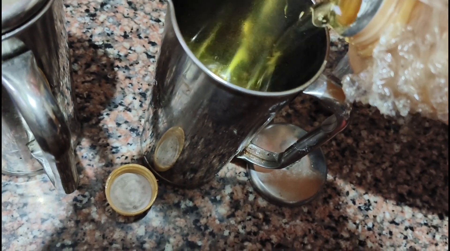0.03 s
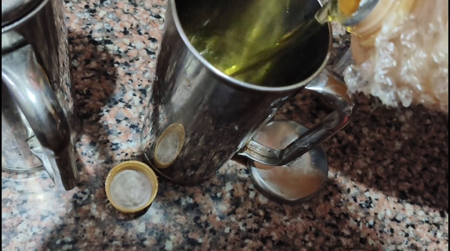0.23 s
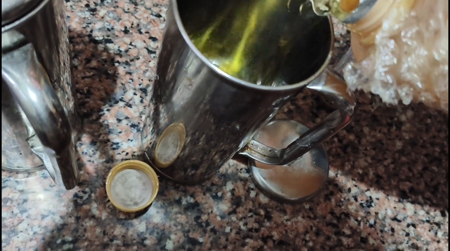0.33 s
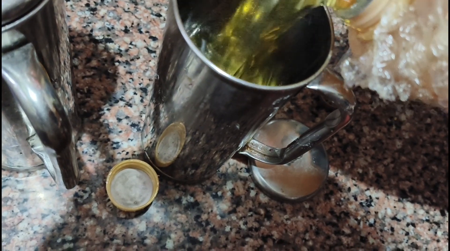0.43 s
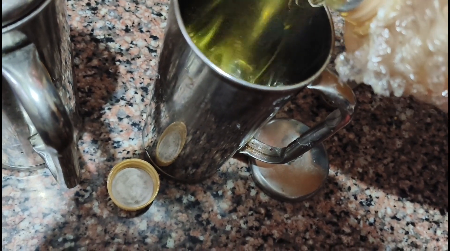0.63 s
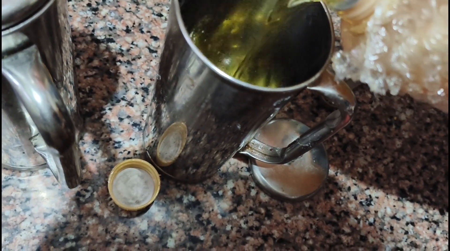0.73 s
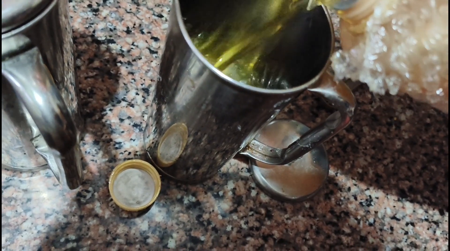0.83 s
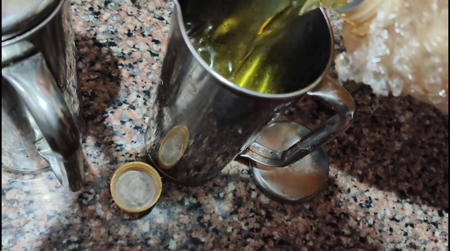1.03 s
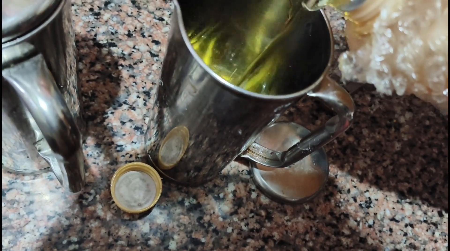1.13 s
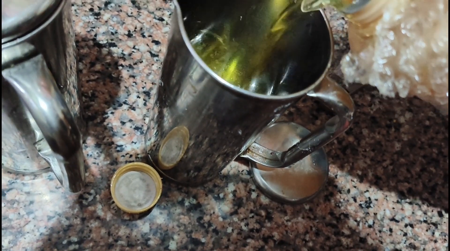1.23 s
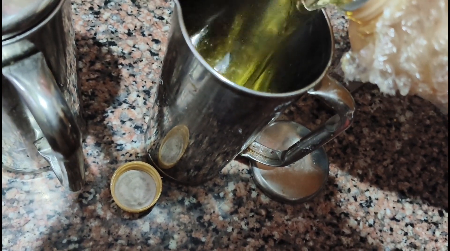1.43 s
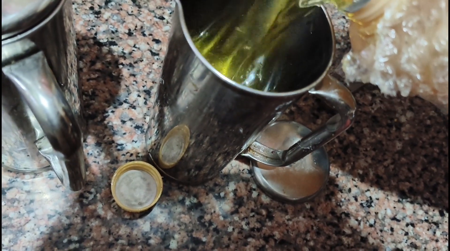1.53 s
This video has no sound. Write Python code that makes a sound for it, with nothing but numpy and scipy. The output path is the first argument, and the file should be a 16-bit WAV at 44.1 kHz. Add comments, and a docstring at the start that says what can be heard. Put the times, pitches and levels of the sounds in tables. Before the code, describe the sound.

Irregular hollow plops sound close by, left of the microphone, as liquid drips into a metal jug on a kitchen counter. One loud plop comes early, then lighter drips, two quick gurgles and a soft swelling rush.

```python
"""Hollow plops come first: oil dribbles from a bottle into a steel jug, close by and to the left.
Each drop makes the air in the jug ring, with wet splats and tiny ringing bubbles.
Shrinking pockets of air gurgle upward, once early on and twice in quick succession later.
The stone counter and kitchen walls throw back short echoes over a faint hum.
A soft rush swells at the end."""
import sys
import numpy as np
from scipy import signal
from scipy.fft import rfft, irfft
from scipy.io import wavfile
from scipy.ndimage import uniform_filter1d

SR = 44100
rng = np.random.default_rng(int(sys.argv[2]) if len(sys.argv) > 2 else 0)


def pcm_store(signal):
    """Save signal as 16-bit PCM."""
    levels = np.round(np.clip(np.atleast_2d(signal), -1, 1) * 32767)
    wavfile.write(sys.argv[1], SR, levels.astype(np.int16).T)


N = 70560  # 1.6 s

# Table levels are relative. t60 is the time a sound takes to fade by 60 dB.
# drops that set the jug's air ringing: t/s, level/dB, f/Hz, t60/s
PLOPS = [(0.0626, -21.5, 461, 0.052), (.219, 6, 469.2, 0.041), (0.3937, -20.5, 468, 0.076),
         (.4102, -27.5, 476.7, 0.083), (.455, -38, 472, 0.11), (0.5151, -29.5, 475, 0.06),
         (0.5868, -19.5, 462.4, 0.072), (0.656, -30.5, 465, 0.047), (0.6924, -27, 466.8, 0.1),
         (0.7803, -26, 473, 0.086), (0.8255, -30.5, 455, 0.07), (0.8888, -17, 464, 0.091),
         (0.9016, -22, 487, 0.099), (1.1491, -25.5, 420, 0.057), (1.326, -7.5, 431.5, 0.039)]
# wet splats: t/s, low level/dB, middle level/dB, top level/dB
SPLATS = [(0.072, -59.5, -31.5, -53), (0.2179, -20.5, -43, -42.5), (0.259, -38, -39, -40),
          (0.28, -44, -46.5, -49.5), (0.3918, -48.5, -36.5, -45.5), (0.412, -58.5, -25, -58),
          (0.5878, -43.5, -35.5, -38.5), (.656, -53, -30, -58), (0.694, -41.5, -31, -93),
          (0.78, -34.5, -32.5, -42), (.889, -30, -26.5, -17), (1.152, -70, -40, -62.5),
          (1.3117, -31, -26, -54.5), (1.3279, -22.5, -30, -42), (1.382, -35, -35, -54)]
# centres of those three bands: f/Hz
SPLAT_BANDS = [1537, 6800, 11800]
# tone the jug gives a splat: f/Hz, level/dB
JUG_COLOUR = [(100, -27.5), (400, 8), (800, -4.5), (1400, 5), (2200, -1.5), (2850, 5), (3250, -10.5),
              (3650, -12), (4400, -1), (6500, -3.5), (8200, -2.5), (9800, -8), (12000, -11.5), (15500, -9)]
# small ringing bubbles: t/s, level/dB, f/Hz, t60/s
BUBBLES = [(0.0636, -59, 7020, .01), (0.2208, -41.5, 3770, .0059), (0.3835, -46, 5790, 0.0058),
           (.449, -58, 6920, 0.0036), (.514, -65, 4430, 0.081), (0.5439, -54, 9090, 0.0097),
           (.545, -47.5, 7280, 0.019), (0.5744, -47.5, 5620, 0.0068), (0.578, -51, 4500, 0.0075),
           (0.588, -48.5, 1352, 0.043), (0.6578, -38, 6300, 0.0059), (0.656, -46, 1440, 0.018),
           (0.6891, -43, 4490, 0.015), (0.7634, -47, 7860, .009), (0.83, -48.5, 2147, 0.18),
           (0.8429, -37, 6780, 0.01), (0.865, -40.5, 1455, 0.068), (0.865, -48.5, 2530, 0.05),
           (0.8889, -28, 6290, 0.005), (0.891, -29, 5106, 0.0017), (1.0608, -43.5, 2050, 0.021),
           (1.0606, -49, 4610, 0.0052), (1.148, -45.5, 344, 0.16), (1.215, -48, 1053, 0.086),
           (1.3116, -29.5, 2290, 0.0022), (1.312, -35, 4330, 0.0031), (1.3268, -33, 2124, 0.011),
           (1.3277, -28, 6440, 0.00083)]
# blurred notes of the steel jug: f/Hz, level/dB, width/Hz
STEEL_NOTES = [(1490, -6.5, 110), (2879, 8, 98), (4220, -0.5, 440), (4880, -7, 310), (5980, -14, 590),
               (8005, -0.5, 300)]
# closing air pockets: t/s, length/s, level/dB, first f/Hz, last f/Hz
GURGLES = [(.268, .044, -35, 800, 2350), (1.212, .056, -40, 540, 920), (1.272, .036, -54, 1250, 2700)]
# loudness of the liquid's low burble: t/s, level/dB
BURBLE_LEVELS = [(1.11, -79), (1.147, -57.5), (1.157, -52.5), (1.201, -48.5), (1.237, -53.5),
                 (1.269, -61.5), (1.321, -62)]
# tone of the burble: f/Hz, level/dB
BURBLE_COLOUR = [(90, -14.5), (200, 9.5), (280, -6), (360, 2), (500, 9), (640, -36.5), (1200, -76.5)]
# loudness of the closing rush: t/s, body level/dB, treble level/dB
RUSH_LEVELS = [(1.342, -76.5, -54), (1.39, -60, -55.5), (1.425, -47.5, -67), (1.477, -55, -62),
               (1.495, -44.5, -47), (1.531, -42, -43), (1.549, -31.5, -38), (1.6, -37, -37.5)]
# tone of its body and its treble: f/Hz, level/dB
RUSH_BODY = [(100, -36), (260, -37), (350, -2), (700, -0.5), (1150, 0), (1600, -8.5), (3000, -41)]
RUSH_TREBLE = [(700, -31.5), (1500, 1), (3000, 1.5), (5000, 1), (7000, -7.5), (10000, -15), (15000, -27),
               (16500, -37)]
# first echoes at each ear: delay/s, level/dB
ECHOES_LEFT = [(.0193, -5.8), (.0351, -14.3), (.0574, -27.9), (.0682, -22.3), (.1192, -33.3), (.1364, -37)]
ECHOES_RIGHT = [(.0094, -16.6), (.0193, -11.5), (.0351, -15.7), (.0505, -15), (.0743, -23), (.1118, -35.3),
                (.1319, -33.6)]
# how long the kitchen rings: f/Hz, t60/s
KITCHEN_DECAY = [(100, 0.17), (460, 0.43), (1500, 0.23), (5000, 0.14), (9000, 0.21), (16000, 0.13)]
# tone of the room's air and of the hum: f/Hz, level/dB
AIR_COLOUR = [(20, -20), (70, -6), (120, -6), (250, -9), (500, 0), (1000, -22), (2200, -12), (3400, -23.5),
              (6000, -19), (10000, -33), (16000, -45.5)]
HUM_COLOUR = [(20, -20.5), (50, -17), (73, 19.5), (95, 8.5), (150, -12.5), (300, -55.5)]
# loudness of the hum: t/s, level/dB
HUM_LEVELS = [(0, -83.5), (.16, -63), (.42, -63.5), (.53, -76), (.68, -58.5), (.9, -82.5), (1.101, -77),
              (1.241, -54.5), (1.38, -80), (1.6, -75)]

PLOP_RISE_S, THUMP_S, THUMP_DB = 0.0037, 0.00058, -31.5
CAVITY_HZ, CAVITY_WIDTH_HZ = 479, 175  # the jug's air rounds off every plop
SPLAT_RISE_S, SPLAT_T60_S = 0.0005, 0.011
BUBBLE_RISE_PER_S, BUBBLE_GLIDE_S, BUBBLE_WOBBLE = 5, 0.006, 0.025
BUBBLE_ATTACK_CYCLES, BUBBLE_ATTACK_MAX_S = 3.4, 0.0024
BUBBLE_ROUGH, BUBBLE_ROUGH_CYCLES = 0.4, 7
TICK_SAMPLES, TICK_ENERGY_S = 4096, 0.005  # a tick is one splat or one bubble
JUG_T60_S, STEEL_T60_S, STEEL_DB = 0.033, 0.14, -12.5
GURGLE_BEND, GURGLE_WOBBLE, GURGLE_ROUGH = 1.4, 0.025, 0.1
GURGLE_GAIN_DB, GURGLE_FADE_DB = 2, -13
AIR_DB, TREBLE_LIMIT_HZ = -66, 16300


def plops():
    """Each drop pushes the air in the jug: a low thump, and one low note that rings on."""
    notes, thumps = np.zeros((2, N))
    t = np.arange(SR // 4) / SR
    for start, db, hz, t60 in PLOPS:
        envelope = (1 - np.exp(-t / PLOP_RISE_S)) * amp(db - 60 * t / t60)
        add(notes, start, envelope * np.sin(2 * np.pi * hz * t))
        add(thumps, start, amp(db + THUMP_DB) * (t / THUMP_S) ** 2 * np.exp(-t / THUMP_S))
    notes = signal.lfilter(*signal.iirpeak(CAVITY_HZ, CAVITY_HZ / CAVITY_WIDTH_HZ, SR), notes)
    return pan(notes + thumps, right_db=-13.5) + room(notes, echo_db=0, tail_db=-21)


def splats():
    """Each wet splat is a short burst of noise, coloured by the jug."""
    out = np.zeros((2, N))
    t = np.arange(TICK_SAMPLES) / SR
    hz = abs(np.fft.fftfreq(TICK_SAMPLES, 1 / SR))
    envelope = (1 - np.exp(-t / SPLAT_RISE_S)) ** 2 * amp(-60 * t / SPLAT_T60_S)
    for start, *bands_db in SPLATS:
        gain = amp(value_at(list(zip(SPLAT_BANDS, bands_db)), hz) + value_at(JUG_COLOUR, hz))
        # a filter with these gains that keeps the start sharp (minimum phase)
        colour = np.fft.ifft(np.exp(np.conj(signal.hilbert(np.log(gain))))).real
        burst = in_jug(rng.standard_normal(TICK_SAMPLES) * envelope, direct=0.42)
        add(out, start, signal.fftconvolve(burst, colour[None], axes=1))
    return out


def bubbles():
    """Each tiny bubble swells into an unsteady note that rises a little and dies away."""
    out = np.zeros((2, N))
    t = np.arange(TICK_SAMPLES) / SR
    glide = 1 + BUBBLE_RISE_PER_S * np.minimum(t, BUBBLE_GLIDE_S)
    for start, db, hz, t60 in BUBBLES:
        cycles = np.cumsum(hz * (glide + BUBBLE_WOBBLE * wobble(TICK_SAMPLES))) / SR
        attack_s = min(BUBBLE_ATTACK_CYCLES / hz, BUBBLE_ATTACK_MAX_S)
        envelope = (1 - np.exp(-(t / attack_s) ** 2)) ** 2 * amp(-60 * t / t60)
        # the bursting film roughens the note, anew every few cycles
        roughness = 1 + BUBBLE_ROUGH * wobble(TICK_SAMPLES, BUBBLE_ROUGH_CYCLES * SR / hz)
        note = envelope * roughness * np.sin(2 * np.pi * cycles)
        add(out, start, amp(db) * in_jug(note, direct=1.3))
    return out


def ticks():
    """Splats and bubbles set the steel ringing and spread into the room."""
    wet = splats() + bubbles()
    ringing = wet + steel_ring(wet)
    reflected = room(ringing[0], echo_db=-27.5, tail_db=-12.5)
    return pan(ringing, right_db=-11.5) + pan(reflected, right_db=0.5)


def in_jug(x, direct):
    """A tick bounces between the steel walls; direct weighs the part that comes straight out."""
    t = np.arange(len(x)) / SR
    walls = unit_energy(rng.standard_normal((2, len(x))) * amp(-60 * t / JUG_T60_S))
    walls[:, 0] += direct
    scattered = signal.fftconvolve(x[None], walls, axes=1)[:, :len(x)]
    # as much energy as a sound of level 1 that lasts TICK_ENERGY_S
    return unit_energy(scattered) * np.sqrt(TICK_ENERGY_S * SR)


def steel_ring(x):
    """The jug holds a short, blurred, hollow ring after every tick."""
    t = np.arange(SR // 4) / SR
    hiss = rng.standard_normal((2, len(t)))
    ring = 0
    for hz, db, width in STEEL_NOTES:
        peak = signal.iirpeak(hz, hz / width, SR)
        ring += amp(db) * signal.lfilter(*peak, signal.lfilter(*peak, hiss))
    ring = unit_energy(ring * amp(-60 * t / STEEL_T60_S))
    return amp(STEEL_DB) * signal.fftconvolve(x, ring, axes=1)[:, :N]


def gurgles():
    """Over a low burble, shrinking pockets of air rise in pitch, faster and faster."""
    out = noise(BURBLE_COLOUR)[0] * loudness(*np.transpose(BURBLE_LEVELS), left=-120, right=-120)
    for start, length, db, first_hz, last_hz in GURGLES:
        progress = np.arange(0, length, 1 / SR) / length
        hz = first_hz * (last_hz / first_hz) ** (progress ** GURGLE_BEND)
        cycles = np.cumsum(hz * (1 + GURGLE_WOBBLE * wobble(len(hz)))) / SR
        flutter = 1 + GURGLE_ROUGH * wobble(len(hz))
        swell = amp(db + GURGLE_GAIN_DB) * np.minimum(progress / 0.37, 1)
        fade = np.sqrt(1 - progress) * amp(GURGLE_FADE_DB * progress)  # quieter as it shrinks
        add(out, start, flutter * swell * fade * np.sin(2 * np.pi * cycles))
    return pan(out, right_db=-6) + room(out, echo_db=-15.5, tail_db=-9.5)


def rush():
    """A soft, wide rush with a hollow body and a hissing top."""
    times, body_db, treble_db = np.transpose(RUSH_LEVELS)
    body = loudness(times, body_db, left=-120) * noise(RUSH_BODY, likeness=0.065)
    treble = loudness(times, treble_db, left=-120) * noise(RUSH_TREBLE, likeness=0.063)
    return body + treble


def room(x, echo_db, tail_db):
    """Single echoes off the counter and near walls, and a tail where each band fades at its own speed."""
    echoes = np.zeros((2, N))
    for ear, reflections in zip(echoes, (ECHOES_LEFT, ECHOES_RIGHT)):
        for delay, db in reflections:
            add(ear, delay, amp(db) * x)
    hz, t, bands = signal.stft(rng.standard_normal((2, SR // 2)), SR, nperseg=256)
    envelope = amp(-60 * t / value_at(KITCHEN_DECAY, hz)[:, None]) * np.minimum(t / 0.0022, 1)
    response = signal.istft(bands * envelope, SR, nperseg=256)[1]
    tail = signal.fftconvolve(x[None], response / np.linalg.norm(response[0]), axes=1)[:, :N]
    return amp(echo_db) * echoes + amp(tail_db) * tail


def background():
    """Quiet room air and a low hum that swells and sinks."""
    air = amp(AIR_DB) * noise(AIR_COLOUR, likeness=0.1)
    hum = loudness(*np.transpose(HUM_LEVELS)) * noise(HUM_COLOUR, likeness=0.84)
    return pan(air, right_db=-4.5) + hum


def noise(colour, likeness=0):
    """Stereo noise of level 1 with the given tone; likeness 1 makes both ears the same."""
    left, other = rng.standard_normal((2, N))
    right = likeness * left + np.sqrt(1 - likeness ** 2) * other
    gain = amp(value_at(colour, np.fft.rfftfreq(N, 1 / SR)))
    return unit_level(irfft(rfft([left, right]) * gain, N))


def wobble(size, span=150):
    """A random waver of level 1 that turns about every span samples."""
    return unit_level(uniform_filter1d(rng.standard_normal(size), size=max(round(span), 1)))


def amp(db):
    """Turns decibels into a gain."""
    return 10 ** (np.asarray(db) / 20)


def pan(x, right_db):
    """Leaves the left ear as it is and changes the right by right_db."""
    return x * amp([[0], [right_db]])


def loudness(times, db, left=None, right=None):
    """A gain for every sample; left and right are the dB before and after the listed times."""
    return amp(np.interp(np.arange(N) / SR, times, db, left=left, right=right))


def value_at(points, hz):
    """Reads between a table's rows on a log-frequency scale."""
    f, value = np.transpose(points)
    return np.interp(np.log(hz + 1), np.log(f), value)


def unit_level(x):
    """Scales a sound to an average (RMS) level of 1."""
    return x / np.sqrt(np.mean(x ** 2) + 1e-20)


def unit_energy(x):
    """Scales each ear so its squared samples add up to 1."""
    return x / np.linalg.norm(x, axis=1, keepdims=True)


def add(mix, start_s, sound):
    """Mixes a sound in at start_s, dropping what runs past the end."""
    part = mix[..., max(round(start_s * SR), 0):][..., :sound.shape[-1]]
    part += sound[..., :part.shape[-1]]


def scene():
    """All sources together."""
    return plops() + ticks() + gurgles() + rush() + background()


def record(dry):
    """Cuts off the very highest treble."""
    lowpass = signal.firwin(255, TREBLE_LIMIT_HZ, window=("kaiser", 9), fs=SR)
    return signal.oaconvolve(dry, lowpass[None], "same")


dry = scene()
out = record(dry)
pcm_store(out)
```